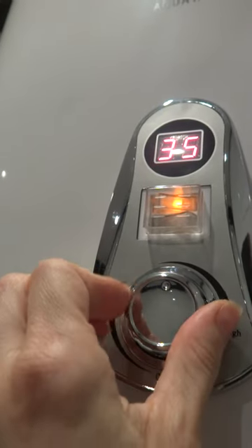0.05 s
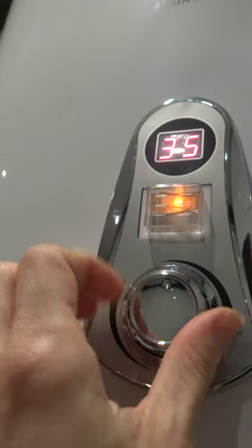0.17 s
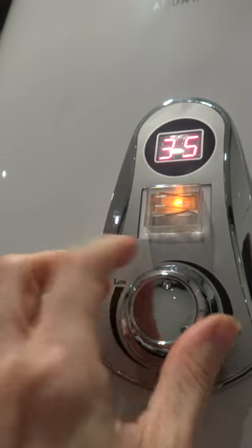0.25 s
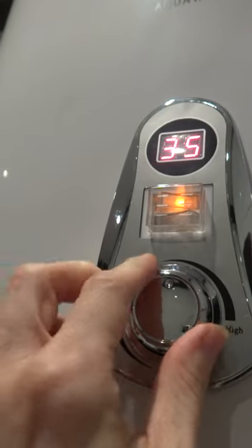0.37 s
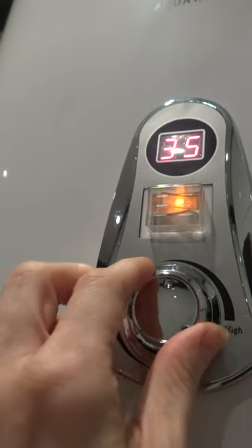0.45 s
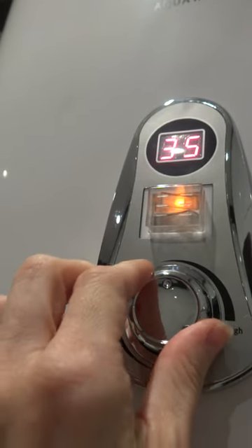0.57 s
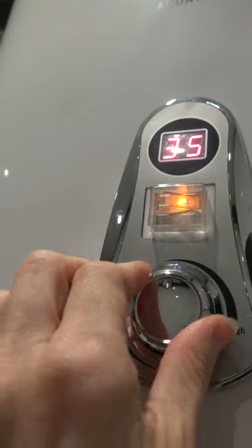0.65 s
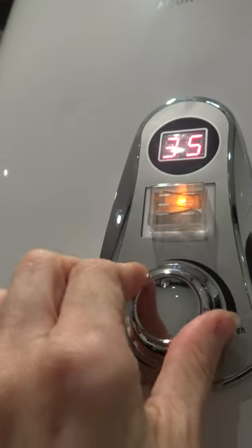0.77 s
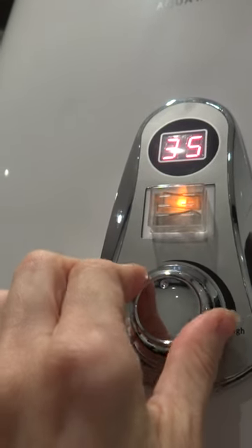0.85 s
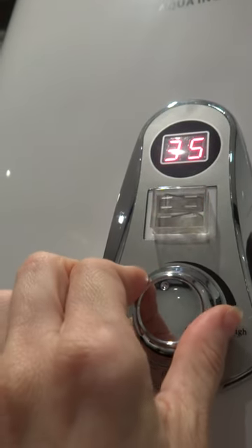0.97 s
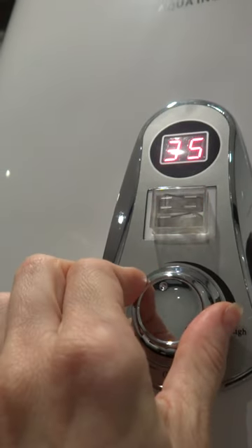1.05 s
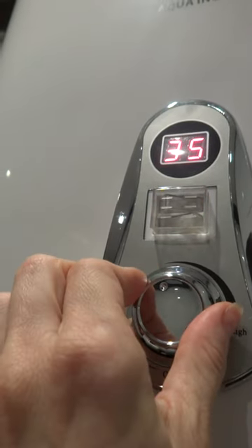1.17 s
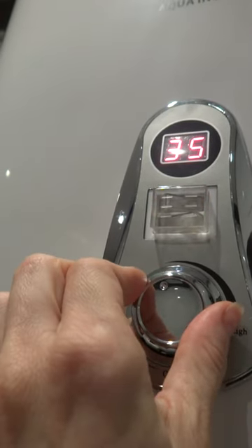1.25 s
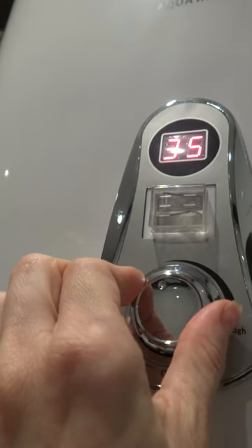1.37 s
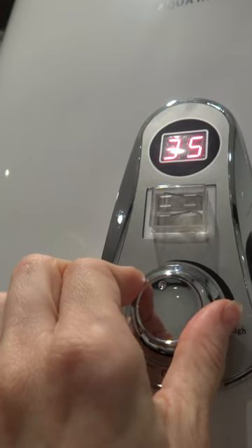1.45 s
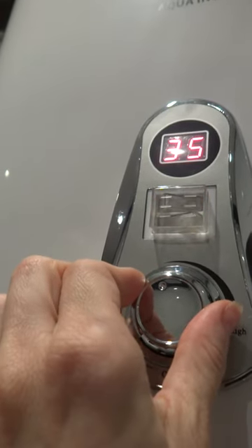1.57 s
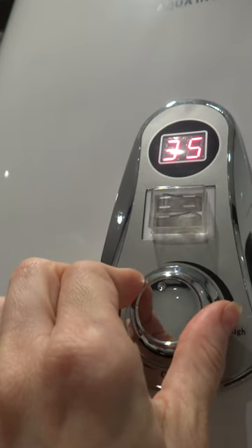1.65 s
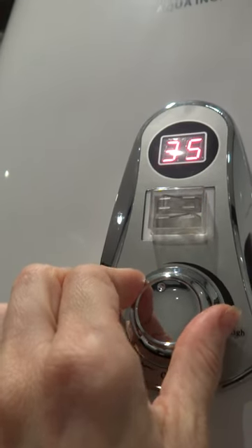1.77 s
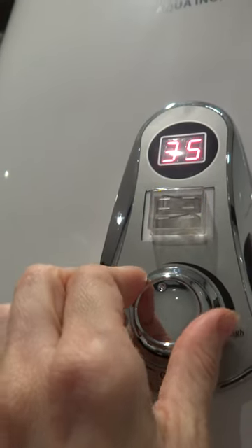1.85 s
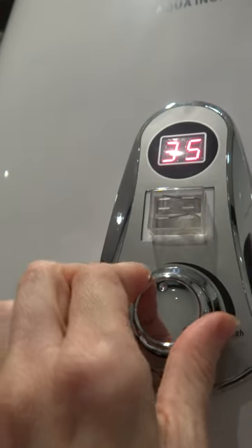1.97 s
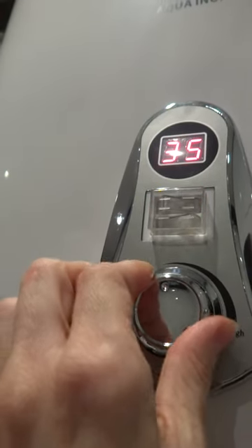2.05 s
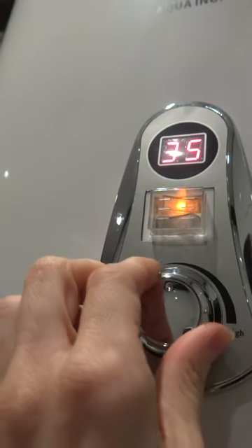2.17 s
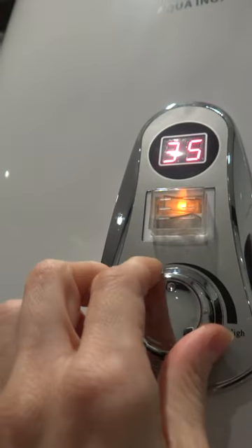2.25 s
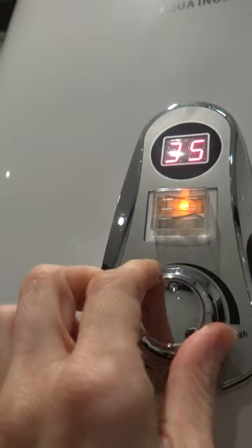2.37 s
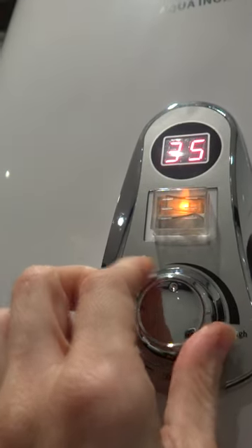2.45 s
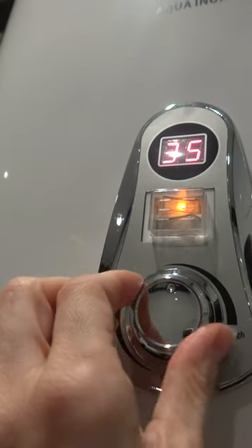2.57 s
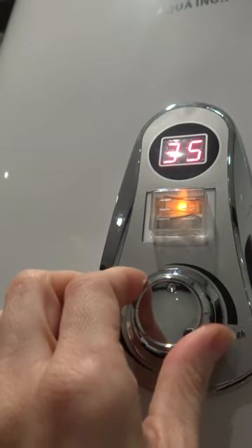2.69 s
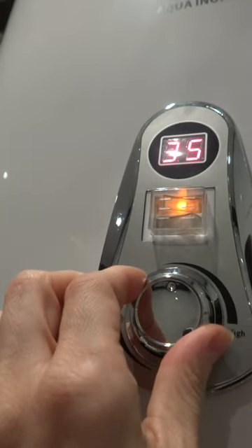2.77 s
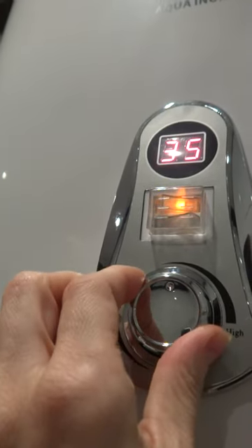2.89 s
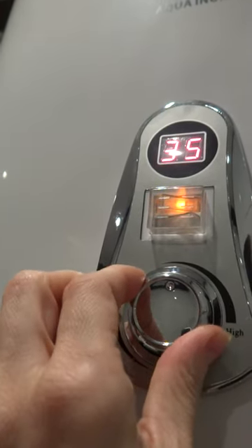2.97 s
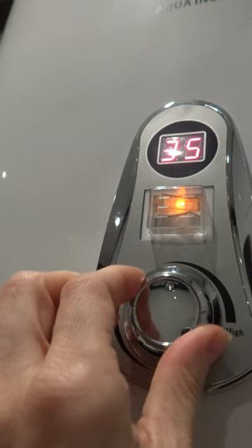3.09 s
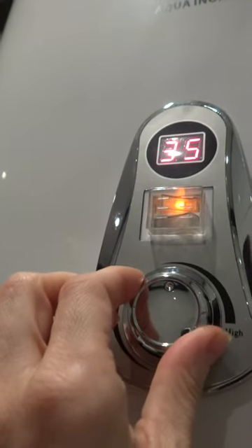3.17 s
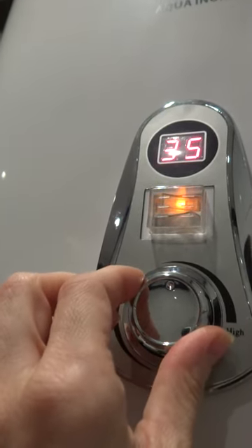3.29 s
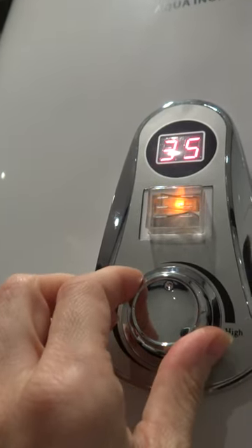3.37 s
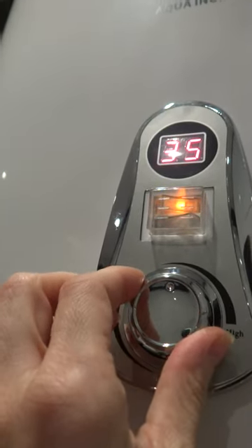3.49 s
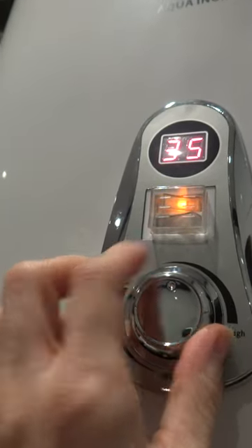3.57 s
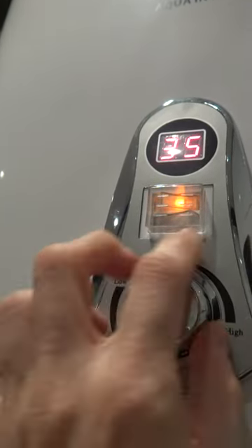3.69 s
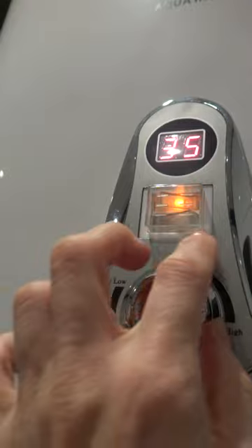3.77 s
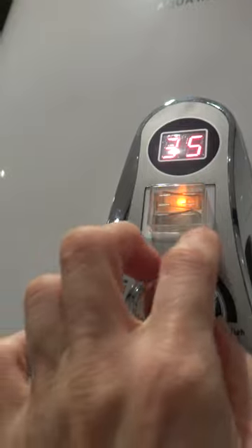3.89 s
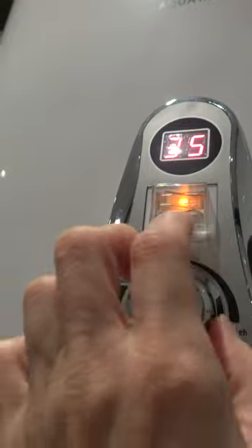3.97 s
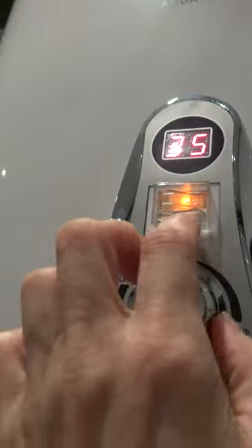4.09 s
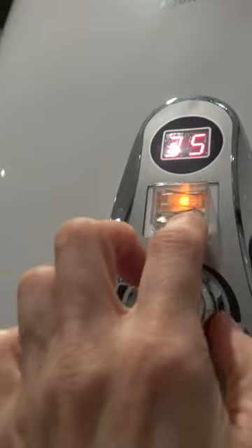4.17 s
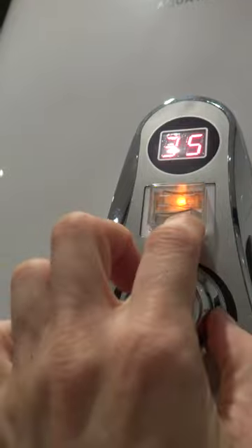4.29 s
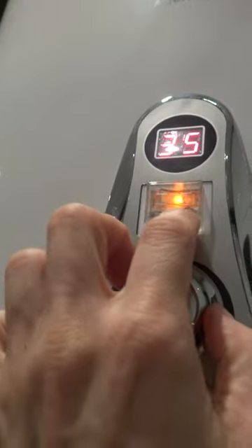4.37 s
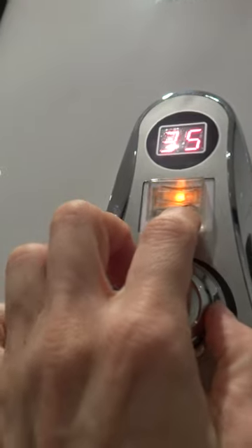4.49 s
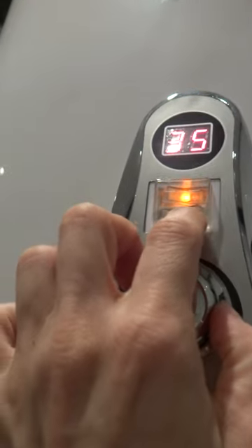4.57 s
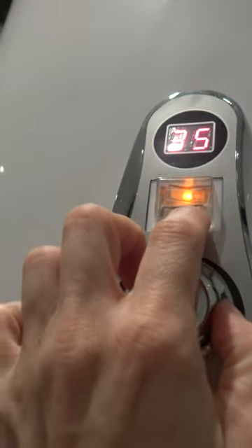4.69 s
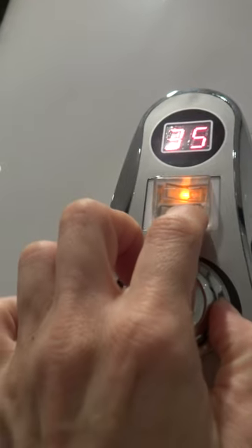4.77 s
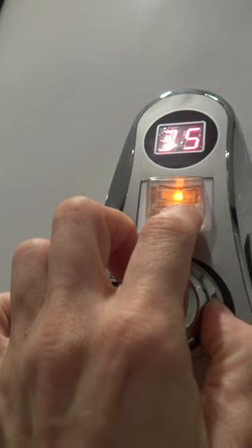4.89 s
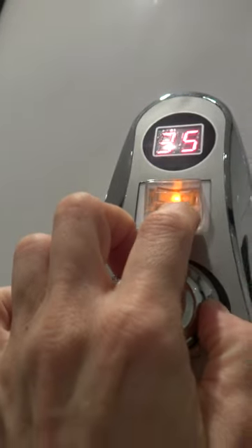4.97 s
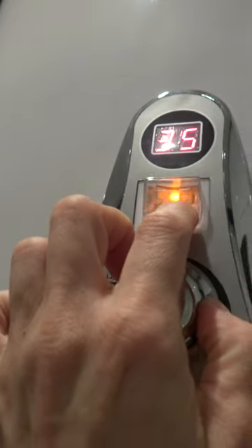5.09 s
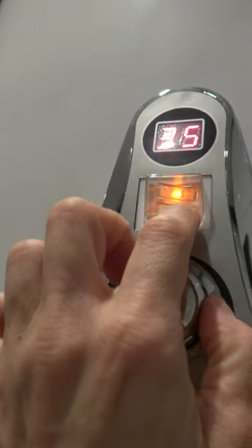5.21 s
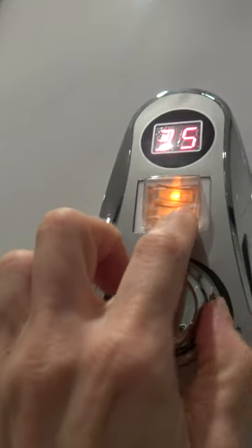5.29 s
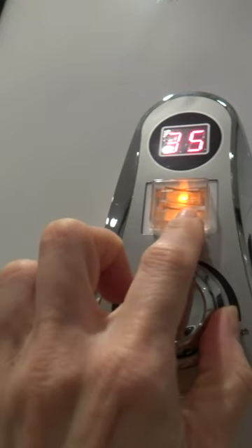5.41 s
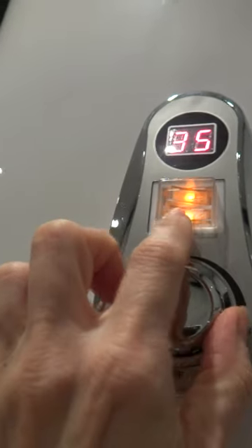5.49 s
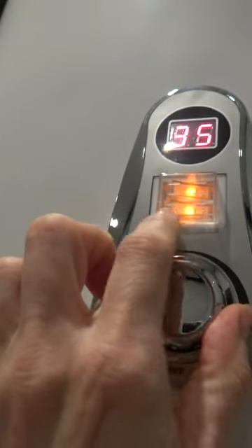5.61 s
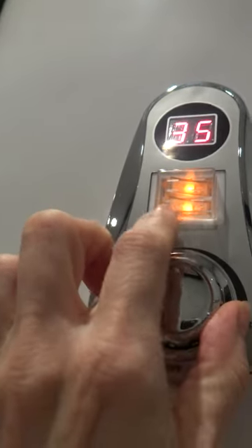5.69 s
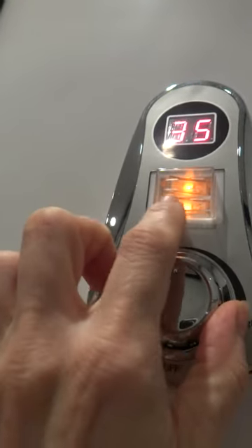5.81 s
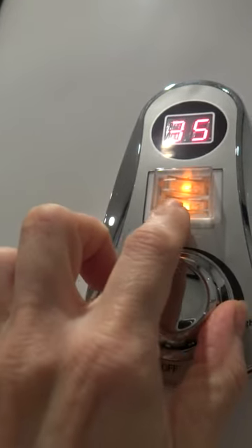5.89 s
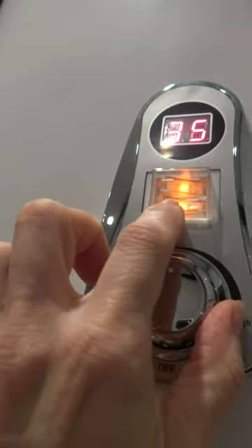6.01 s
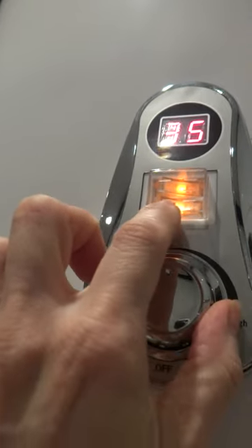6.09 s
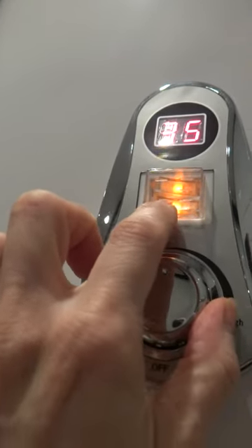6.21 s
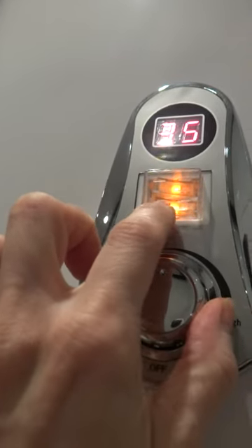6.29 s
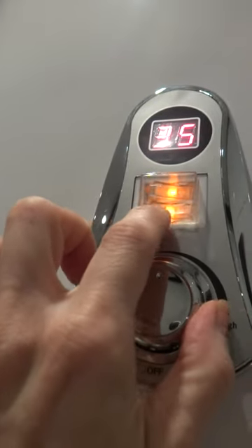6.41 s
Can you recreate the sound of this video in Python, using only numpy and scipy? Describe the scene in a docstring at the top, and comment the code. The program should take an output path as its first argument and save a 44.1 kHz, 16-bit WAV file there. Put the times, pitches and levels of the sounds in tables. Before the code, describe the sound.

A quiet, hard-surfaced room with faint steady hiss and a drifting low rumble. A wall clock ticks once per second from about 0.35 s, small, diffuse and mostly reverberation. Close to the microphone, fingertips bump a hollow plastic heater case in the first half second: soft low thuds, small knocks, and a clearer tap near 0.44. A faint grainy rub follows at 0.63. At 0.98 the knob snaps with a sharp, bright click and short room tail; at 2.2 it clicks back, again crisp, with a faint boom. Tiny taps come around 2.5. Near 3.9 to 4.1 fingers touch down softly, and the case rumbles very faintly under pressure. Thin skin squeaks and rubs occur at 4.3 and 4.5 to 4.8. At 4.94 a rocker switch snaps, double and hard, starting a dense plastic rattle, ringing panel and hollow boom that fade within half a second. Only hiss and clock ticks remain until about 6.4.

```python
"""The controls of a wall-mounted water heater, heard close by: a knob clicks off and on again, as damped
modes with noise bursts, then a rocker switch snaps and sets the hollow case rattling (random impacts) and ringing.
Fingers bump (case modes, noise taps) and rub (grainy noise) on the plastic; the case rumbles under the press.
A wall clock ticks once a second, mostly as reverberation of a hard, quiet room.
Coloured noise forms the room's hiss and drifting low rumble."""
import sys
import numpy as np
from scipy import signal
from scipy.fft import rfft, irfft, next_fast_len
from scipy.io import wavfile
from scipy.ndimage import uniform_filter1d

SR = 44100
rng = np.random.default_rng(int(sys.argv[2]) if len(sys.argv) > 2 else 0)


def master(y):
    """Save y as 16-bit WAV."""
    cut = np.clip(np.atleast_2d(y).T, -1, 1)
    pcm = np.round(cut * 32767)  # scale
    wavfile.write(sys.argv[1], SR, pcm.astype(np.int16))


N = 284445
TIME = np.arange(N) / SR  # seconds through the scene
AGE = np.arange(SR) / SR  # seconds since the onset of a short sound

# Resonances of the hollow case. Each row: frequency in Hz, 60 dB decay time in s, relative level in dB.
CASE = [(74, 0.83, -24), (128.4, 0.38, 1.5), (161, 0.68, -17), (222, 0.49, -9), (252.7, 0.52, -9),
        (294, 0.096, -3.5)]


def amp(db):
    """Level law: a gain is ten to the power of dB / 20."""
    return 10 ** (np.asarray(db) / 20)


def unit(x):
    """Normalization: scale a signal to rms 1."""
    return x / np.sqrt(np.mean(x ** 2) + 1e-20)


def along(points, hz):
    """Logarithmic pitch scale: read (Hz, value) points by interpolation over log frequency."""
    f, v = np.transpose(points)
    return np.interp(np.log(hz + 1), np.log(f + 1), v)


def fade(t, t60):
    """Exponential decay: the level falls 60 dB in t60 seconds."""
    return np.exp(-np.log(1000) * t / t60)


def swell(start, rise_db, attack, hold, t60):
    """Growth and decay: a gain sets in rise_db under its top, climbs, holds, then dies away."""
    t = TIME - start
    climb = amp(rise_db * (np.clip(t / attack, 0, 1) - 1))
    return (t >= 0) * climb * fade(np.maximum(t - attack - hold, 0), t60)


def filtered(x, response):
    """Linear filtering: multiply the spectrum by a complex response of frequency."""
    n = x.shape[-1]
    m = next_fast_len(n + 8192)  # zero padding
    spectrum = rfft(x, m) * response(np.fft.rfftfreq(m, 1 / SR))
    return irfft(spectrum, m)[..., :n]


def noise(colour, size):
    """Spectral shaping: white noise takes a given colour, at rms 1."""
    return unit(filtered(rng.standard_normal(size), lambda hz: amp(along(colour, hz))))


def spread(pair, alike):
    """Interchannel coherence: mix two unrelated signals into a left and right of given likeness."""
    def weights(hz):
        turn = np.arccos(np.clip(along(alike, hz), -1, 1)) / 2
        return np.array([np.cos(turn), np.sin(turn)])

    mid, side = filtered(pair, weights)
    return np.array([mid + side, mid - side])


def add(track, s, sound):
    """Superposition: mix a sound into the track, in place, at s seconds."""
    part = track[..., max(round(s * SR), 0):][..., :sound.shape[-1]]
    part += sound[..., :part.shape[-1]]


def crack(colour, t60):
    """Contact noise: an impact of rough surfaces is a decaying burst of coloured noise."""
    return noise(colour, size=SR) * fade(AGE, t60)


def ring(modes, attack=0., cycles=0.):
    """Modal synthesis: damped sines build up over attack seconds plus some of their own cycles."""
    total = np.zeros(SR)
    for k, (hz, t60, db) in enumerate(modes):
        sign = (-1) ** k  # neighbours in opposite sign
        level = amp(db + rng.normal(0, 0.95))
        build = 1 - np.exp(-AGE / (attack + cycles / hz))
        total += sign * level * fade(AGE, t60) * build * np.sin(2 * np.pi * hz * AGE)
    return total


def room(sound, alike, build=0.0052):
    """Reverberation: convolve with a diffuse stereo tail whose decay time depends on frequency."""
    # Decay of the room. Each row: frequency in Hz, 60 dB decay time in seconds.
    room_t60 = [(120, 0.45), (1000, 0.61), (3500, 0.51), (8000, 0.56), (15000, 0.28)]
    # Colour of the reverberant field. Each row: frequency in Hz, relative level in dB.
    room_send = [(120, 5.5), (400, 5), (900, -3.5), (2000, 0), (4000, -3), (7000, -5), (11000, -10.5),
                 (15000, -12.5)]
    hz, t, z = signal.stft(rng.standard_normal((2, SR * 3 // 4)), SR, nperseg=256)
    envelope = fade(t, along(room_t60, hz)[:, None]) * (1 - np.exp(-t / build))
    tail = signal.istft(z * envelope, SR, nperseg=256)[1]
    tail = spread(tail / np.linalg.norm(tail[0]), alike)
    tail = filtered(tail, lambda f: amp(along(room_send, f)))
    return signal.fftconvolve(sound[None], tail, axes=1)[:, :len(sound)]


def near(sound, wet_db):
    """Direct and reverberant field: a sound on the heater is followed by the room's answer."""
    # Coherence of the reverberation. Each row: frequency in Hz, left-right likeness from -1 to 1.
    near_alike = [(120, 0.99), (300, 0.63), (900, 0.68), (3000, 0.82), (10000, 0.98)]
    return sound + amp(wet_db) * room(sound, near_alike)


def knob():
    """Snap action: the cam lets a sprung contact jump over, exciting damped modes and contact noise."""
    # Modes of the knob's switch. Each row: frequency in Hz, 60 dB decay time in s,
    # relative level in dB turning off, relative level in dB turning on.
    knob_modes = [(350, 0.011, -48, -31), (765, 0.011, -17, -21), (938, 0.019, -18, -29),
                  (1064, 0.022, -28.5, -23.5), (1271, 0.034, -36.5, -29.5), (1717, 0.04, -33.5, -39),
                  (2370, 0.009, -31.5, -24.5), (3300, 0.016, -29, -41), (3520, 0.018, -27, -26),
                  (3880, 0.019, -65, -36), (5200, 0.022, -36, -45), (8050, 0.025, -36, -56),
                  (10420, 0.013, -38, -26), (13800, 0.016, -41, -30)]
    # Contact noise turning off. Each row: frequency in Hz, relative spectral level in dB per Hz.
    off_crack = [(50, -20), (300, -3), (1500, -8), (3500, 5.5), (6000, -5), (10000, -8.5), (13500, 5.5),
                 (16000, -13)]
    # Contact noise turning on. Each row: frequency in Hz, relative spectral level in dB per Hz.
    on_crack = [(50, -37), (260, -9.5), (1500, -2), (3500, -7), (6000, -8), (8300, -19), (10500, 0.5),
                (12500, -3.5), (14500, 4), (16000, -2)]
    off_s, on_s = 0.98, 2.1995  # the contact opens, then closes
    out = np.zeros((2, N))
    hz, t60, off_db, on_db = np.transpose(knob_modes)
    off = amp(2.5) * ring(zip(hz, t60, off_db), cycles=2.1) + amp(-27.5) * crack(off_crack, t60=0.031)
    add(off, .0048, amp(-27.5) * crack(off_crack, t60=0.0029))  # the contact bounces once
    on = amp(-1.5) * ring(zip(hz, t60, on_db), cycles=0.86) + amp(-21) * crack(on_crack, t60=0.022)
    add(out, off_s, near(off, wet_db=1.0))
    add(out, on_s, near(on, wet_db=0.5))
    add(out, on_s, amp(-56.5) * ring(CASE, attack=0.016))  # the harder snap booms faintly in the case
    return out


def rocker():
    """Impact excitation: the switch's snap starts a rattle, the panel's modes and the boom of the case."""
    # Release, then landing of the switch. Each row: start in seconds, relative level in dB.
    snaps = [(4.9405, -27), (4.9436, -19)]
    # Contact noise of the switch. Each row: frequency in Hz, relative spectral level in dB per Hz.
    rocker_crack = [(50, -42), (200, -39), (700, 3.5), (1200, 5), (3500, 2.5), (4800, -10.5), (9000, -10.5),
                    (16000, -23)]
    # Modes of the front panel. Each row: frequency in Hz, relative level in dB.
    panel = [(726.7, -51), (807.5, -70), (866.7, -71), (1044, -43.5), (1130, -49), (1217, -51), (1572, -63),
             (1680, -59), (1712, -45), (1766, -55), (1825, -72), (2035, -64), (2159, -44), (2207, -59),
             (2250, -53), (2326, -51), (2400, -44), (2616, -56), (2762, -71), (2885, -61), (3295, -57),
             (3386, -51), (3494, -55), (3596, -67), (3784, -61), (3828, -57), (4134, -74), (4393, -58)]
    landing = snaps[-1][0]
    out = rattle(landing)
    for s, db in snaps:
        add(out, s, amp(db) * crack(rocker_crack, t60=0.016))
    panel_modes = [(hz, .42, db) for hz, db in panel]
    add(out, landing, amp(11.5) * ring(panel_modes, attack=0.025))
    out = near(out, wet_db=-5.5)
    add(out, landing, amp(-31) * ring(CASE, attack=0.044))
    return out


def rattle(start, rate=1400, fizz=1.0):
    """Shot noise: loose plastic parts chatter in random impacts, rate per second, mixed with noise."""
    # Colour of the chatter. Each row: frequency in Hz, relative spectral level in dB per Hz.
    rattle_colour = [(30, -55), (330, -24), (500, -12.5), (780, -10.5), (1150, 3.5), (1350, -9), (1750, 1),
                     (2350, -3.5), (2800, -7.5), (3600, -7), (4500, -18), (5500, -24.5), (8500, -25),
                     (16000, -41)]
    impacts = (rng.random(N) < rate / SR) * rng.choice([-1, 1], N)
    excitation = unit(impacts) + fizz * rng.standard_normal(N)
    chatter = filtered(excitation, lambda hz: amp(along(rattle_colour, hz)))
    return amp(-27.5) * unit(chatter) * swell(start, rise_db=7, attack=0.022, hold=0.039, t60=0.31)


def grip():
    """Forced vibration: the case rumbles faintly as a finger's force on the rocker builds, then eases."""
    # Colour of the rumble. Each row: frequency in Hz, relative spectral level in dB per Hz.
    grip_colour = [(20, -45), (45, -18), (68, 3), (110, 0), (250, -18), (900, -63)]
    force = swell(3.92, rise_db=23, attack=0.81, hold=0.14, t60=1.1)
    return amp(-72.5) * force * noise(grip_colour, size=N)


def bumps():
    """Contact stiffness: soft fingertips thud in the case modes; nails and the knob's play knock and tick."""
    # Fingers meeting knob and case. Each row: start in seconds, then relative levels in dB
    # of the thud, the knock and the tick.
    contacts = [(.064, -50, -49, -80), (.080, -57, -54.5, -69), (.133, -49, -55.5, -71),
                (0.173, -76, -71, -65), (.211, -84, -49.5, -58.5), (0.4357, -51.5, -44, -44.5),
                (.476, -71, -54, -74), (2.121, -68, -58, -79), (2.49, -79, -60.5, -75),
                (2.576, -70.5, -58.5, -65), (3.872, -71, -73, -64), (3.97, -63, -70, -64.5),
                (4.092, -52.5, -58, -73)]
    # Colour of the knock. Each row: frequency in Hz, relative spectral level in dB per Hz.
    knock_colour = [(40, -31), (100, -18), (260, -5), (430, -6.5), (680, 4), (950, -8), (1600, -21),
                    (5000, -41)]
    # Colour of the tick. Each row: frequency in Hz, relative spectral level in dB per Hz.
    tick_colour = [(500, -15), (1300, -7), (2100, 4.5), (2700, -10), (3450, 6), (4500, -11), (7000, -20),
                   (15000, -27)]
    thuds, taps = np.zeros(N), np.zeros(N)
    for s, thud_db, knock_db, tick_db in contacts:
        add(thuds, s, amp(thud_db) * ring(CASE, attack=0.0054))
        knock = amp(knock_db) * crack(knock_colour, t60=0.045)
        add(taps, s, knock + amp(tick_db) * crack(tick_colour, t60=0.039))
    return near(thuds, wet_db=-8.0) + near(taps, wet_db=-3)


def rubs(width_hz=280, grain_db=4.5):
    """Sliding friction: skin on plastic gives a grainy hiss with one faint squeaky resonance."""
    # Strokes of the skin. Each row: start in seconds, length in seconds, resonance in Hz,
    # relative level of the resonance in dB, relative level of the hiss in dB.
    strokes = [(0.144, 0.088, 2180, -69, -83), (0.632, 0.31, 3600, -72.5, -75),
               (0.631, 0.27, 2200, -75, -91), (2.09, 0.12, 3500, -75, -72.5),
               (4.271, 0.067, 2520, -59, -78.5), (4.541, 0.11, 2725, -59, -61),
               (4.598, 0.16, 3200, -73, -68), (4.678, 0.15, 3400, -77, -64)]
    # Colour of the hiss. Each row: frequency in Hz, relative spectral level in dB per Hz.
    skin = [(500, -5.5), (2000, -0.5), (5500, -4), (9000, -7.5), (15000, -8.5)]
    out = np.zeros(N)
    for s, length, hz, squeak_db, hiss_db in strokes:
        n = int(length * SR)
        envelope = np.sin(np.pi * np.linspace(0, 1, n) ** 0.45) ** 2  # quick rise, slower fall
        squeak = unit(filtered(rng.standard_normal(n), lambda f: 1 / (1 + (2 * (f - hz) / width_hz) ** 2)))
        roughness = unit(uniform_filter1d(rng.standard_normal(n), size=60))
        grain = unit(amp(grain_db * roughness))
        add(out, s, envelope * grain * (amp(squeak_db) * squeak + amp(hiss_db) * noise(skin, size=n)))
    return near(out, wet_db=1.5)


def clock(lead=0.022, settle=.011):
    """Escapement impacts in a diffuse field: the gears stir, step and settle, heard mostly via the room."""
    # Strength of the ticks in turn: one relative level in dB for each.
    tick_levels = [-43, -44, -40.5, -45, -42, -39, -42.5]
    # Colour of the tick. Each row: frequency in Hz, relative spectral level in dB per Hz.
    clock_colour = [(60, -39), (450, -27), (650, -10.5), (900, -10.5), (1250, -2), (1450, 4.5),
                    (1650, -5.5), (2200, -7.5), (2900, -5.5), (3220, -7.5), (3500, -5.5), (5000, -15.5),
                    (6500, -16), (10000, -26), (16000, -30)]
    # Coherence of the reverberation. Each row: frequency in Hz, left-right likeness from -1 to 1.
    far_alike = [(200, 0.41), (900, 0.32), (2500, 0.72), (8000, 0.81)]
    first_s, period_s = .349, 1
    out = np.zeros((2, N))
    for k, db in enumerate(tick_levels):
        s = first_s + k * period_s  # the step itself
        tick = amp(-9.5) * crack(clock_colour, t60=0.048)
        add(tick, lead, crack(clock_colour, t60=0.033))
        add(tick, lead + settle, amp(-2) * crack(clock_colour, t60=0.026))
        add(out, s - lead, amp(db) * (amp(-14) * tick + room(tick, far_alike, build=0.0021)))
    return out


def hush(split_hz=700):
    """Partly coherent background noise: the room's slowly drifting low rumble under a steady hiss."""
    # Colour of the background. Each row: frequency in Hz, relative spectral level in dB per Hz.
    quiet = [(12, -36), (20, -17), (91, -6), (234, -4.5), (301, -2.5), (337, -3), (499, -5.5), (558, -4),
             (698, -5.5), (873, -6), (1530, -11.5), (2320, -12), (4670, -20), (11800, -26), (16000, -30)]
    # Coherence of the background. Each row: frequency in Hz, left-right likeness from -1 to 1.
    quiet_alike = [(60, 0.96), (150, 0.46), (380, -0.45), (950, -0.6), (2380, -0.37), (5980, 0.54),
                   (15000, 0.99)]
    # Drift of the low rumble. Each row: time in seconds, gain on the low part in dB.
    rumble = [(0, 5), (.8, 1), (1.601, -2.5), (2.4, 1), (3.0, -2.5), (3.4, 1.5), (4.6, 1.5), (6.45, -0.5)]
    air = spread(np.array([noise(quiet, size=N), noise(quiet, size=N)]), quiet_alike)
    low = filtered(air, lambda hz: 1 / (1 + (hz / split_hz) ** 2))
    hiss = air - low
    s, db = np.transpose(rumble)
    return amp(-63.5) * (hiss + low * amp(np.interp(TIME, s, db)))


def scene():
    """Interchannel level and phase: all but the hush is a little louder, and leads in phase, at the right."""
    # Level difference. Each row: frequency in Hz, left minus right in dB.
    lean = [(150, -0.4), (400, -2.5), (900, -5), (2500, -3.5), (6000, -2.5), (14000, -1)]
    # Phase difference. Each row: frequency in Hz, phase in radians by which left leads right.
    lag = [(100, -0.22), (800, -0.22), (1400, -0.39), (2200, -0.13), (14000, -0.038)]
    sources = knob() + rocker() + grip() + bumps() + rubs() + clock()
    sides = np.array([[.5], [-.5]])  # half of each difference to left and to right

    def placement(hz):
        return amp(sides * along(lean, hz)) * np.exp(1j * sides * along(lag, hz))

    return filtered(sources, placement) + hush()


def record(dry, low_cut_hz=42, top_hz=15950):
    """Band limiting: the microphone sheds the deepest bass; the recorder keeps nothing above top_hz."""
    return filtered(dry, lambda hz: hz ** 2 / np.hypot(hz ** 2, low_cut_hz ** 2) * (hz < top_hz))


dry = scene()
out = record(dry)
master(out)
```